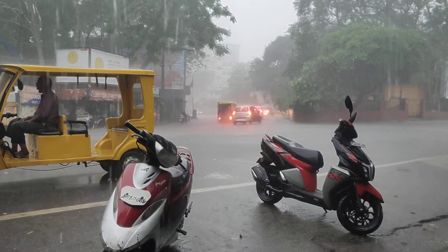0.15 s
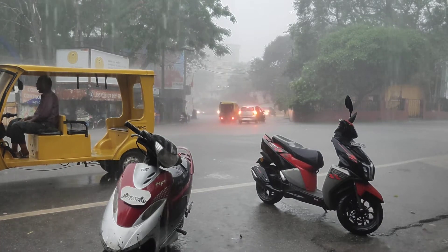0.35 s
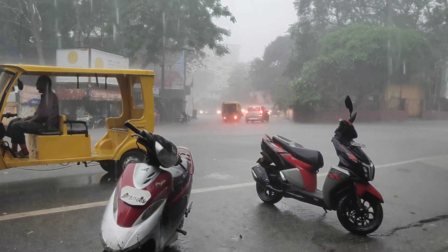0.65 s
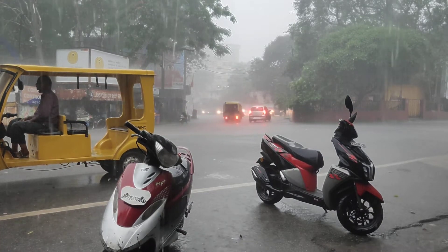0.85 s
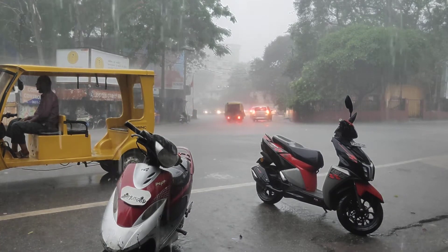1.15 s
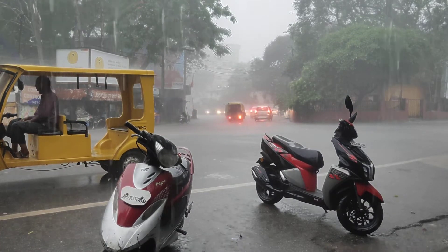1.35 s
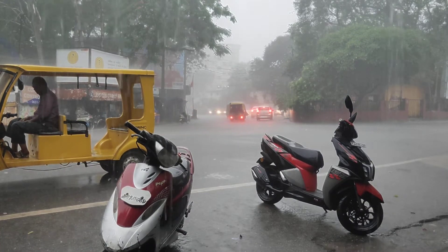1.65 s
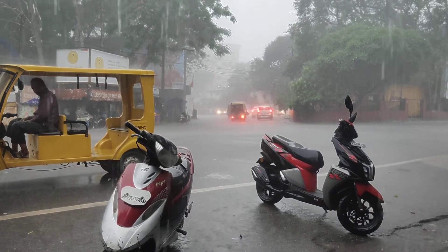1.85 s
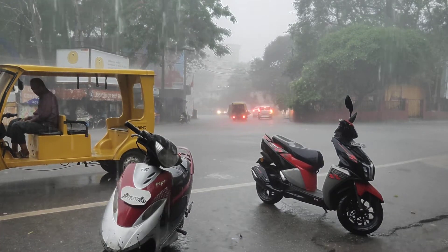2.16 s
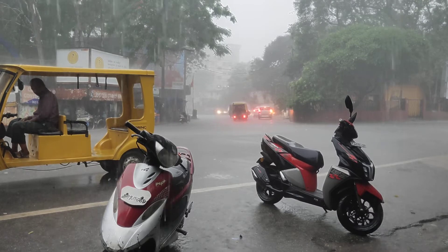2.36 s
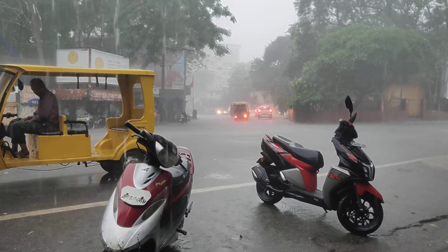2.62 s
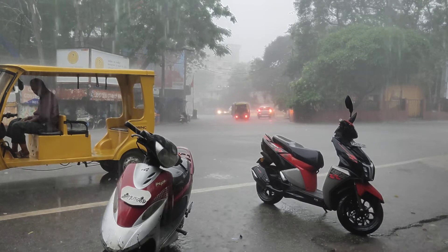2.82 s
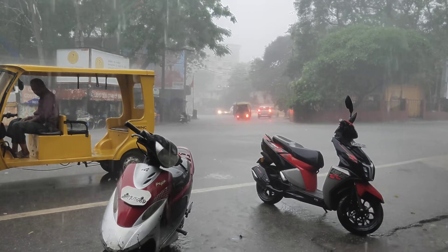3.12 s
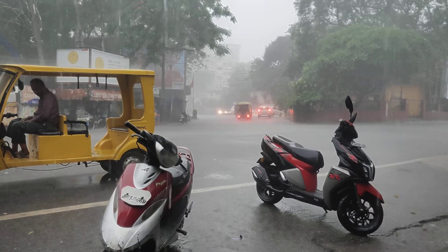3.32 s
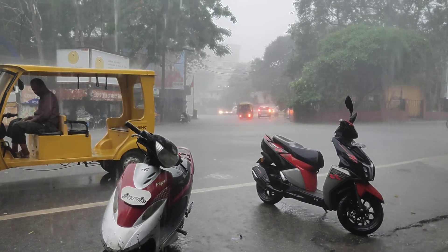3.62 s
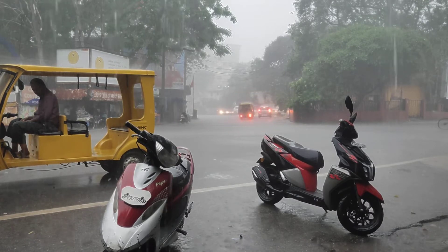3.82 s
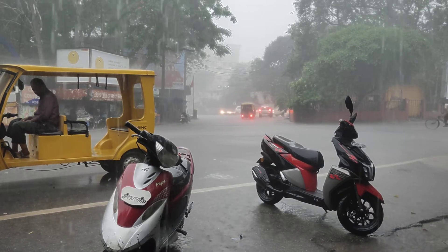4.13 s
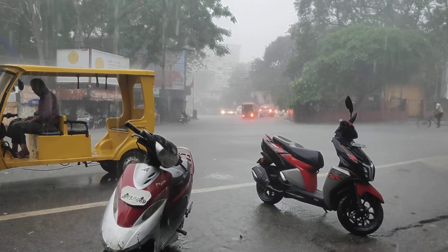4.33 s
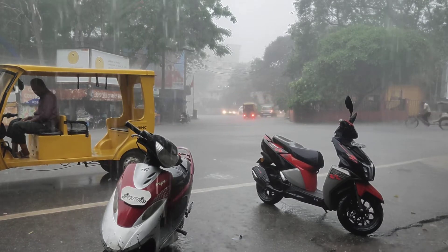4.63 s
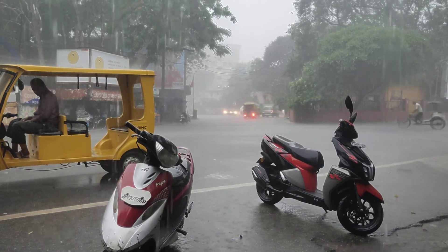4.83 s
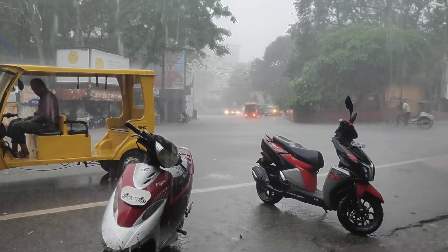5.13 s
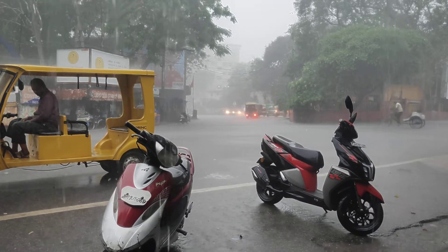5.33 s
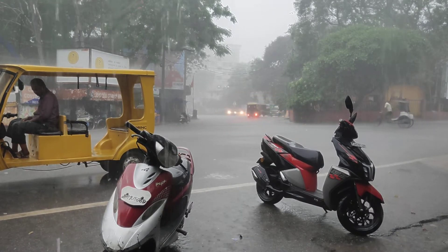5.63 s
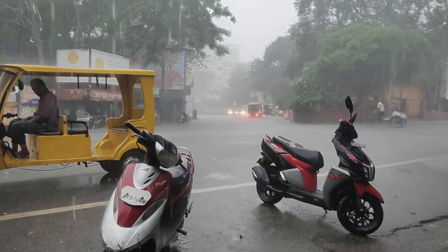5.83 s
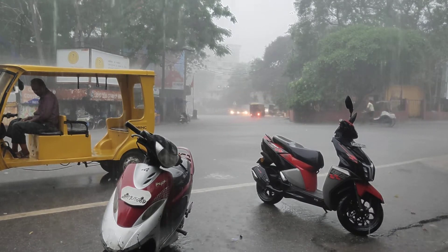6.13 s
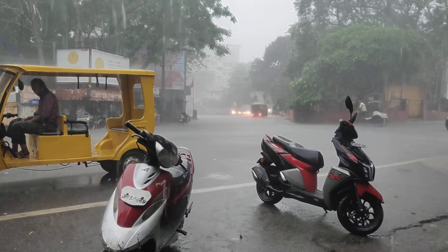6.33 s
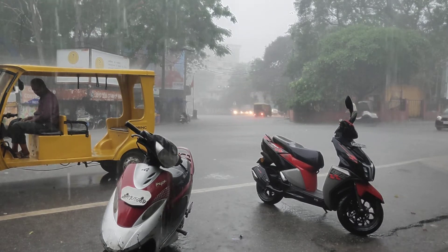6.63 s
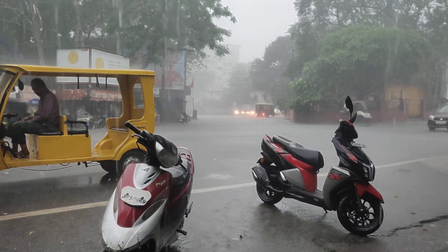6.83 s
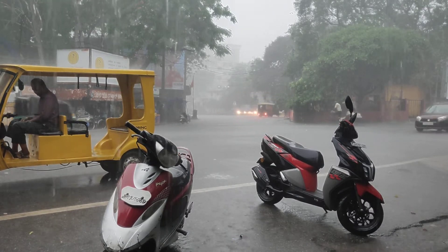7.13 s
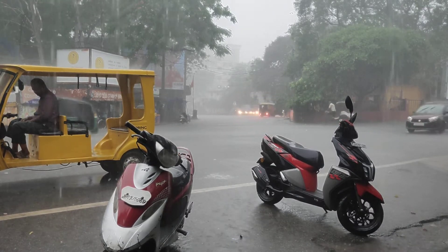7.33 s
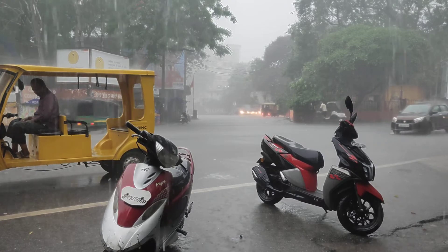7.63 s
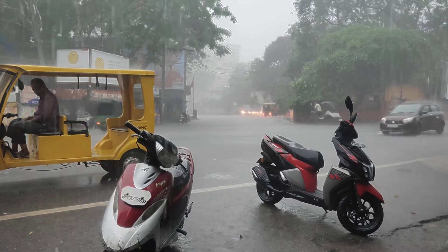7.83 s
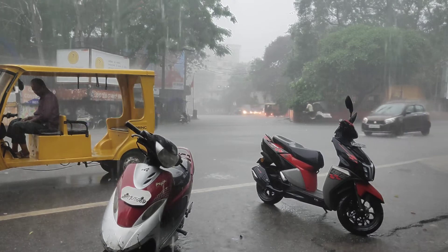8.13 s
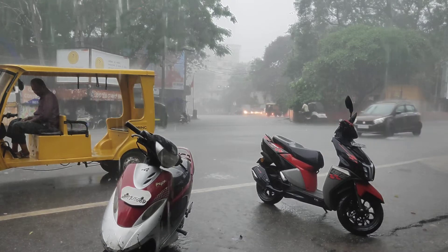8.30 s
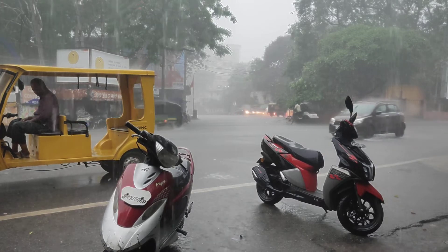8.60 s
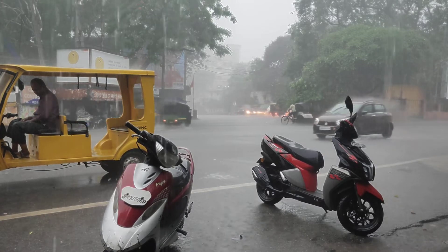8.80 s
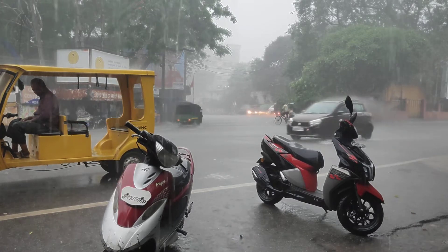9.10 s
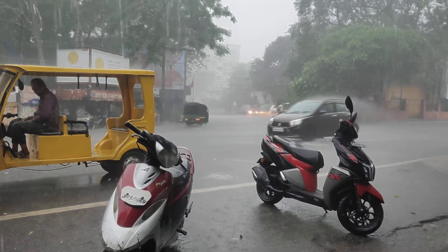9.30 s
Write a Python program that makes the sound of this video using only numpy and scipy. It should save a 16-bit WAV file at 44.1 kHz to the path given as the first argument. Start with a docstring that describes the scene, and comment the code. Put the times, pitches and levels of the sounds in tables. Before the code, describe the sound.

Steady heavy rain drums on a city street, muffled from shelter, while low traffic rumbles, tyres swish and a distant horn toots twice.

```python
"""Heavy rain on a city street, muffled, heard from a shelter through two microphone ports.
Background: thin hiss, flickering narrow noise bands, short blips; over it ragged splashes, low gurgles.
Traffic: bands of noise for rumble, drone, growl and wet-road swish, following level curves.
A small engine thuds, its firings ringing an exhaust; a far horn toots twice: three wavering tones,
and two high noisy bands that brighten with the toots."""
import sys
import numpy as np
from scipy import signal
from scipy.fft import rfft, irfft, next_fast_len
from scipy.io import wavfile
from scipy.ndimage import map_coordinates

SR = 44100
rng = np.random.default_rng(int(sys.argv[2]) if len(sys.argv) > 2 else 0)


def to_wav(sig):
    """Store sig (one row per channel, or 1-D mono) as 16-bit WAV at the path in sys.argv[1].

    Samples outside -1..1 are clipped; the rate is SR.
    """
    pcm = np.clip(np.atleast_2d(sig), -1, 1) * 32767
    pcm = np.round(pcm).astype(np.int16)
    wavfile.write(sys.argv[1], SR, pcm.T)  # frames by channels


N = 417186

# even hiss before level curve and spots: freq_hz, left_db_per_hz, right_db_per_hz
HISS = [(60, -110, -110), (307, -87, -91.5), (500, -91, -90), (1000, -89, -94), (1290, -102, -101),
        (2200, -103, -102), (2900, -106, -104), (3850, -108, -102.5), (4600, -106.5, -101),
        (6600, -96.5, -98.5), (7300, -100.5, -103)]
# narrow noise bands, left port then right, before flicker and level curve:
# centre_hz, width_hz, peak_db_per_hz
BANDS = [
    [(995, 125, -74), (1520, 170, -86), (1700, 70, -86), (1985, 190, -83), (2325, 70, -93),
     (2580, 140, -87), (2760, 80, -92), (3130, 130, -89.5), (3380, 90, -94), (3690, 80, -99),
     (4070, 120, -98), (4935, 100, -92), (5680, 90, -87.5), (5880, 60, -93), (6185, 100, -85),
     (6920, 110, -95), (7550, 70, -95)],
    [(870, 90, -87), (1500, 220, -91.5), (1995, 230, -82.5), (2470, 130, -91), (2650, 140, -90),
     (3060, 100, -90), (3230, 110, -89), (3430, 100, -87.5), (3620, 120, -84), (3850, 90, -89.5),
     (4440, 80, -87.5), (4950, 100, -88), (5390, 130, -89.5), (6200, 110, -88.5), (7260, 90, -97),
     (7555, 60, -93)],
]


def amp(db):
    """Amplitude ratio from dB."""
    return 10 ** (np.asarray(db) / 20)


def unit(x):
    """Scale to rms 1."""
    return x / np.sqrt(np.mean(x ** 2) + 1e-20)


def along(points, hz):
    """Interpolate (Hz, value, ..) points on a log axis, one row per value column."""
    f, *cols = np.transpose(points)
    return np.array([np.interp(np.log(hz + 1), np.log(f + 1), c) for c in cols])


def curves(rows):
    """One value per sample for each column after the time."""
    time_s, *cols = np.transpose(rows)
    return [np.interp(np.arange(N) / SR, time_s, c) for c in cols]


def wobble(rate_hz, count=1):
    """Smooth random curves through rate_hz (at most 39) normal knots a second."""
    knots = rng.standard_normal((count, int(N / SR * 40)))
    coarse = np.arange(0, N + 64, 64)
    position = coarse * min(rate_hz, 39) / SR
    return np.array([np.interp(np.arange(N), coarse, map_coordinates(k, [position])) for k in knots])


def filtered(x, response):
    """x through a complex frequency response."""
    n = x.shape[-1]
    padded = next_fast_len(n + 8192)
    spectrum = rfft(x, padded) * response(np.fft.rfftfreq(padded, 1 / SR))
    return irfft(spectrum, padded)[..., :n]


def frames(x):
    """Short-time spectrum."""
    return signal.stft(x, SR, nperseg=1024, noverlap=768)


def unframe(z):
    """Short-time spectrum back to sound."""
    return signal.istft(z, SR, nperseg=1024, noverlap=768)[1][:, :N]


def blots(shape, tall_hz, long_s):
    """A normal random field over frequency and time, smoothed into blots of rms 1."""
    offset_hz = np.arange(-24, 25)[:, None] * SR / 1024
    offset_s = np.arange(-40, 41) * 256 / SR
    blot = np.exp(-(offset_hz / tall_hz) ** 2 - (offset_s / long_s) ** 2)
    return unit(signal.fftconvolve(rng.standard_normal(shape), blot[None], "same", axes=(1, 2)))


def ports(n):
    """Noise at both ports: shared and differing parts, the left late and less so in the bass."""
    # left-right likeness: freq_hz, correlation
    alike = [(30, 0.93), (150, 0.98), (280, 0.95), (450, 0.75), (800, 0.19), (3000, 0.033)]
    left_lag_s = 19 / 44100

    def mix(hz):
        turn = np.arccos(np.clip(along(alike, hz)[0], 0, 1)) / 2
        return np.array([np.cos(turn), np.sin(turn)])

    def delay(hz):
        lag_s = left_lag_s * (1 - 0.54 / (1 + (hz / 600) ** 4)) * [[1], [0]]
        return np.exp(-2j * np.pi * hz * lag_s)

    mid, side = filtered(rng.standard_normal((2, n)), mix)
    return filtered(np.array([mid + side, mid - side]), delay)


def rush(spectrum, patchy_db):
    """Blotchy shaped noise of rms 1; only the shape of the spectrum counts."""
    z = frames(ports(N))[2]
    patches = amp(patchy_db * blots((1,) + z.shape[1:], 43, 0.038))
    return unit(filtered(unframe(z * patches), lambda hz: amp(along(spectrum, hz))))


def bands(hz):
    """Power per Hz of the narrow noise bands at each port, each a Gaussian bell."""
    def port_power(port):
        centre_hz, width_hz, peak_db = np.transpose(port)
        offset = (hz - centre_hz[:, None]) / width_hz[:, None]
        return amp(peak_db) ** 2 @ np.exp(-4 * np.log(2) * offset ** 2)
    return np.array([port_power(port) for port in BANDS])


def hiss_and_bands():
    """An even hiss, narrow noise bands that come and go, and random short blots of noise between them."""
    # how far the bands come and go: freq_hz, swing_db
    flicker_depth = [(900, 1.5), (1500, 7.5), (2000, 3.5), (3600, 3.5), (4500, 8), (7500, 11.5)]
    # level curve of hiss and bands: time_s, level_db, brightness_db_per_octave
    level_curve = [(0.0, 5.5, 0), (0.9, 2.5, 0.5), (2.0, 0.5, 1), (4.6, 1, 1), (5.3, -0.5, -1),
                   (6.3, 1, -0.5), (9.45, 0, 0)]

    hz, t, z = frames(ports(N))
    together = wobble(17)[0, np.minimum((t * SR).astype(int), N - 1)]  # shared by all bands
    swing_db = along(flicker_depth, hz)[0][:, None] * (blots(z.shape, 100, .03) + .3 * together)
    flicker = amp(2 * swing_db)  # power
    flicker = flicker / np.mean(flicker, axis=2, keepdims=True)
    hiss = amp(along(HISS, hz))[..., None] ** 2
    spots = blots(z.shape, 130, .022)
    spots_power = 14 * np.clip(spots + .3 * together - 1.4, 0, 1.1) ** 2
    power = bands(hz)[..., None] * (flicker + 0.064 * spots_power) + hiss * (1 + spots_power)
    level_db, bright_db = curves(level_curve)
    octaves = np.log2((hz[:, None] + 500) / 3500)
    tilt = amp(octaves * np.interp(t * SR, np.arange(N), bright_db))
    return amp(level_db) * unframe(z * tilt * np.sqrt(power * SR / 2))  # power per Hz to gain


def blips():
    """Short random blips, each ringing at about the pitch of one of a port's narrow bands."""
    blips_per_s, rise_s = 110, .004
    over_band_db, scatter_db = 5.5, 3
    k = np.arange(round(6 * rise_s * SR))
    life = k / SR / rise_s
    out = []
    for port in BANDS:
        which, when, detune = rng.random((int(blips_per_s * N / SR), 3)).T
        hz, width_hz, db = np.transpose(port)[:, (which * len(port)).astype(int)]
        pitch_hz = hz + width_hz * (detune - .5)
        ring = np.sin(2 * np.pi * pitch_hz[:, None] * k / SR) * life * np.exp(1 - life)
        size_db = db + over_band_db + scatter_db * rng.standard_normal(len(hz))
        size = amp(size_db) * np.sqrt(width_hz)
        where = ((when * N).astype(int)[:, None] + k).ravel()
        out.append(np.bincount(where, (size[:, None] * ring).ravel(), N + len(k))[:N])
    return np.array(out)


def traffic():
    """Engines and tyres of the passing cars blur into bands of noise."""
    # passing engines, before wobble: time_s, rumble_db, drone_db
    street = [(0.0, -31, -32), (0.6, -33, -37.5), (1.27, -37, -41.5), (1.62, -35, -35.5), (2.1, -35, -43),
              (2.35, -31.5, -41.5), (2.9, -36, -42.5), (3.35, -28.5, -34), (3.71, -33.5, -40.5),
              (4.06, -29.5, -32.5), (4.45, -34, -43.5), (5.2, -38, -42.5), (5.83, -34.5, -40.5),
              (6.54, -40, -41.5), (7.4, -37.5, -39.5), (8.25, -41.5, -46.5), (8.45, -33, -49.5),
              (9.0, -34, -42.5), (9.45, -27, -40.5)]
    # tyre swish level, before wobble: time_s, swish_db
    tyres = [(0.0, -46.5), (0.4, -46), (1.2, -53), (2.5, -51), (4.4, -49), (5.2, -42), (5.9, -46),
             (6.45, -51.5), (6.75, -46.5), (7.33, -51.5), (7.7, -48), (8.6, -45.5), (9.2, -51.5),
             (9.45, -45.5)]
    # low engine rumble shape: freq_hz, relative_db_per_hz
    rumble_shape = [(27, -15.5), (41, -27), (63, -16), (90, -2.5), (110, -1), (127, 6.5), (145, -1.5),
                    (165, 5), (210, -4), (260, -64)]
    # engine drone shape: freq_hz, relative_db_per_hz
    drone_shape = [(150, -39), (190, -2.5), (240, 1.5), (290, -8), (350, -24.5), (450, -63)]
    # upper engine growl shape: freq_hz, relative_db_per_hz
    growl_shape = [(260, -27), (310, 4.5), (400, -4), (480, -7.5), (600, -41)]
    # wet-road swish shape: freq_hz, left_relative_db_per_hz, right_relative_db_per_hz
    swish_shape = [(450, -26, -30), (570, -13, -7), (640, -5, -2), (690, -3, 0), (780, -5, -13),
                   (860, -20, -22), (1000, -40, -40)]
    growl_mean_db, growl_swing_ratio = -54.5, 1.75

    rumble_db, drone_db = curves(street)
    rumble_gain = amp(rumble_db + 0.81 * wobble(4.11) + [[-.6], [.6]])
    rumble = rumble_gain * rush(rumble_shape, patchy_db=-1.7)
    drone = amp(drone_db + 1.6 * wobble(2.9)) * rush(drone_shape, patchy_db=2.5)
    # the upper growl swells more than the drone as an engine pulls
    growl_db = growl_mean_db + growl_swing_ratio * (drone_db - np.mean(drone_db))
    growl = amp(growl_db) * rush(growl_shape, patchy_db=6.5)
    swish_db = curves(tyres)[0] + 1.3 * wobble(14, count=2)
    swish = amp(swish_db) * rush(swish_shape, patchy_db=3.5)
    return rumble + drone + growl + swish


def engine():
    """One slow cylinder: each firing, a little uneven, rings the exhaust resonances."""
    # firing rate: time_s, firings_per_s
    firing = [(4.579, 14.8), (6.9, 14.8), (7.4, 14.4), (8.6, 14.35)]
    # thud level: time_s, level_db
    thud_level = [(4.3, -60), (4.8, -41.5), (6.6, -45), (7.1, -42.5), (7.85, -39), (8.3, -39), (8.55, -60)]
    # exhaust resonances, per pass: centre_hz, width_hz, relative_db
    exhaust = [(135, 110, 0), (240, 160, -6)]

    def pipe(f):
        total = 0
        for k, (centre, width, db) in enumerate(exhaust):
            resonance = 1j * f * width / (centre * centre - f * f + 1j * f * width)
            total = total + (-1) ** k * amp(db) * resonance
        return total

    turns = np.cumsum(curves(firing)[0]) / SR
    phase = turns - turns[round(firing[0][0] * SR)]
    fired = np.diff(np.floor(phase), prepend=0) > 0
    blows = fired * amp(2.5 * rng.standard_normal(N))
    thud = unit(filtered(blows, lambda f: pipe(f) ** 2))  # two passes
    return amp(curves(thud_level)[0] + [[-.6], [.6]]) * thud


def horn():
    """Three horn tones waver, blur and linger as in street echoes; two high bands brighten with them."""
    # toots: start_s, end_s, gain_db
    toots = [(3.848, 4.21, 3), (4.286, 4.43, -2)]
    # three horn tones, then two high noisy bands: pitch_hz
    pitches = [2589, 3158, 3452, 4457, 4955]
    # one row per pitch, before toot gain and waver: left_db, right_db, blur_share
    pitch_levels = [(-68, -71, .6), (-59, -54, .5), (-60, -55, .55), (-90, -65, 1), (-73, -65, 1)]

    t = np.arange(N) / SR
    on = 0
    for start_s, end_s, gain_db in toots:
        attack = np.clip((t - start_s) / .015, 0, 1)
        linger = amp(-60 * np.clip(t - end_s, 0, None) / .25)  # 60 dB in 0.25 s
        on = on + amp(gain_db) * attack * linger
    total, echoes = 0, ports(N)
    for hz, (*db, share) in zip(pitches, pitch_levels):
        phase = 2 * np.pi * hz * t + .8 * wobble(25, count=2)
        waver = amp(3 * wobble(30, count=2)) * np.sin(phase)
        blur = unit(filtered(echoes, lambda f: np.exp(-((f - hz) / 95) ** 2)))
        total = total + amp(db)[:, None] * (waver + share * blur)
    return on * total


def puffs():
    """Each splash or gurgle is a ragged noise burst around its own pitch, strongest in the bands."""
    # nearby splashes, narrowest heard as pings, levels before raggedness:
    # start_s, pitch_hz, width_octaves, length_s, peak_left_db, peak_right_db
    splashes = [(0.457, 6800, 0.22, 0.037, -43.5, -47), (0.818, 1630, 0.27, .03, -46.5, -55),
                (0.97, 6200, 0.077, 0.021, -42, -59), (1.275, 2100, 0.43, 0.098, -53, -48.5),
                (1.425, 2230, 0.98, 0.087, -48.5, -47), (1.663, 1420, 0.34, 0.053, -43.5, -53),
                (1.718, 5200, 0.57, 0.026, -49, -43), (2.017, 7500, 0.084, 0.024, -45, -60),
                (3.147, 2420, .5, 0.04, -51, -48), (3.228, 6850, 0.15, .025, -50, -50),
                (3.469, 3600, 0.41, 0.042, -48, -44.5), (3.555, 1480, 0.78, 0.04, -42.5, -44.5),
                (3.581, 2200, 1.06, 0.068, -47, -45.5), (4.209, 3320, .5, 0.052, -54, -48.5),
                (4.31, 1540, 0.44, 0.09, -56, -55), (4.596, 4700, .05, 0.031, -57, -55),
                (4.598, 3950, 0.071, 0.068, -54, -51), (6.971, 5680, 0.22, .035, -49, -48),
                (7.091, 4740, 0.39, 0.051, -58.5, -46.5), (7.434, 1440, 1.1, 0.1, -52, -49.5),
                (8.003, 3200, 0.023, 0.22, -55.5, -56), (8.919, 3470, 0.36, 0.05, -50, -43),
                (8.937, 4300, .08, 0.03, -58, -47)]
    # low hollow gurgles, levels before raggedness:
    # middle_s, pitch_hz, length_s, peak_left_db, peak_right_db
    gurgles = [(0.151, 404, 0.19, -39.5, -46.5), (3.017, 765, 0.062, -45, -46),
               (3.741, 358, 0.044, -58, -40), (4.035, 300, 0.22, -43, -48), (4.355, 411, 0.1, -41.5, -51),
               (4.909, 398, 0.091, -50.5, -44), (5.031, 735, 0.078, -39, -63),
               (6.635, 540, 0.075, -40.5, -47), (6.752, 555, 0.046, -63, -39), (7.096, 410, 0.12, -40, -54),
               (7.563, 603, 0.057, -54, -41), (7.769, 382, 0.2, -41, -43), (9.015, 434, 0.06, -41.5, -60),
               (9.264, 432, 0.072, -42.5, -71)]
    splash_rise_s, splash_ragged_hz = .008, 160  # starts fast and crackles
    gurgle_octaves, gurgle_rise_share, gurgle_ragged_hz = 0.23, 0.38, 48.6
    fall_share, ragged_db = 0.69, 2.5  # shares are of the length

    def lift(f):
        return (1 + bands(f) / amp(along(HISS, f)) ** 2) ** .4

    rows = []
    for start_s, hz, octaves, length_s, *db in splashes:
        rows.append((start_s, hz, octaves, length_s, splash_rise_s, splash_ragged_hz, db))
    for middle_s, hz, length_s, *db in gurgles:
        rise_s = gurgle_rise_share * length_s
        rows.append((middle_s - .5 * length_s, hz, gurgle_octaves, length_s, rise_s, gurgle_ragged_hz, db))

    out = np.zeros((2, N + SR))
    for start_s, hz, octaves, length_s, rise_s, ragged_hz, db in rows:
        t = np.arange(SR // 3 if length_s > .085 else SR // 5) / SR

        def colour(f):
            return lift(f) * np.exp(-(1.06 * np.log2((f + 1) / hz) / octaves) ** 2)

        burst = filtered(ports(SR // 3)[:, :len(t)], colour)
        burst = np.array([unit(b) for b in burst])
        ragged = amp(ragged_db * map_coordinates(rng.standard_normal(80), [t * ragged_hz]))
        swell = (1 - np.exp(-(t / rise_s) ** 2)) * np.exp(-(t / (fall_share * length_s)) ** 0.92)
        start = round(start_s * SR)
        out[:, start:start + len(t)] += amp(db)[:, None] * burst * swell / swell.max() * ragged
    return out[:, :N]


def scene():
    """The street as it reaches both ports."""
    return hiss_and_bands() + blips() + traffic() + engine() + horn() + puffs()


def record(dry):
    """The recorder rolls off at the top and keeps nothing above its band limit."""
    # treble roll-off: freq_hz, gain_db
    roll_off = [(7550, -1), (7750, -11), (7900, -18.5), (8050, -36.5)]
    top_hz = 8210
    return filtered(dry, lambda hz: amp(along(roll_off, hz)[0]) * (hz < top_hz))


dry = scene()
out = record(dry)
to_wav(out)
```